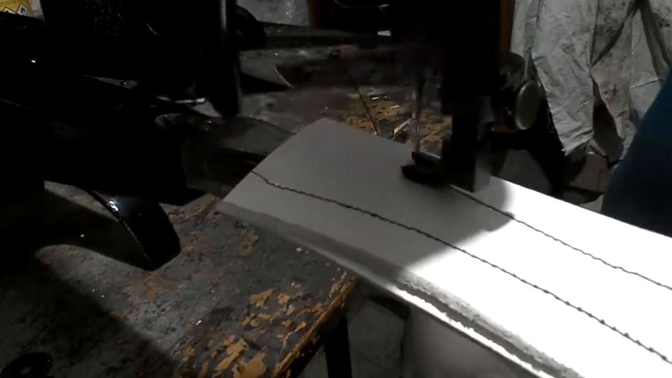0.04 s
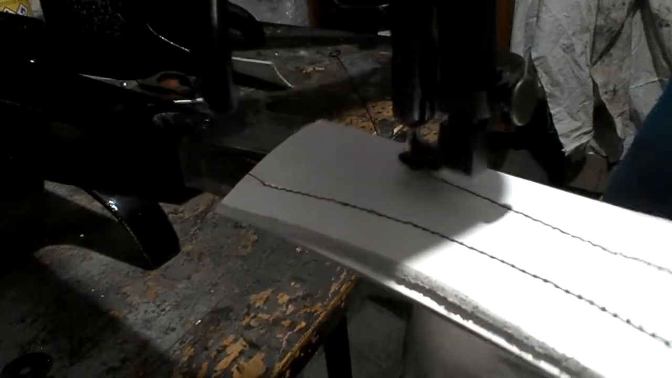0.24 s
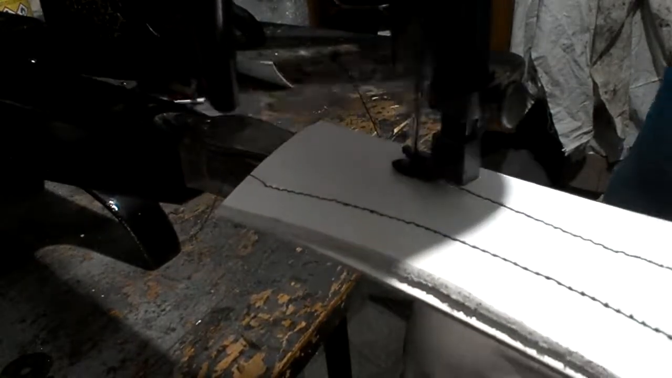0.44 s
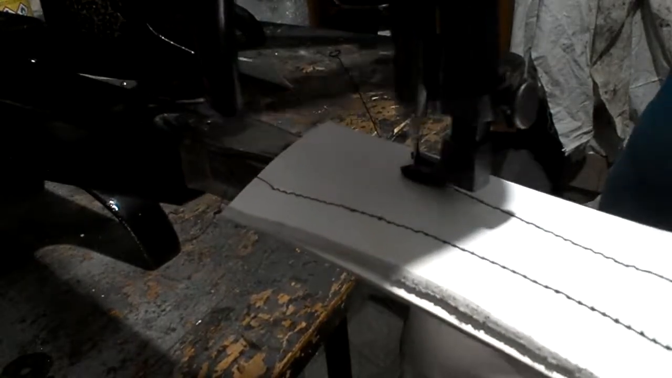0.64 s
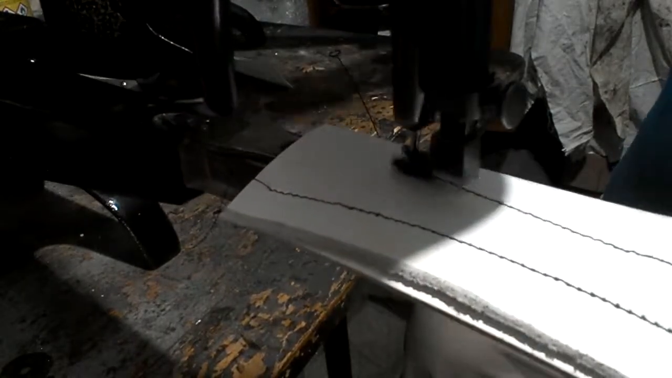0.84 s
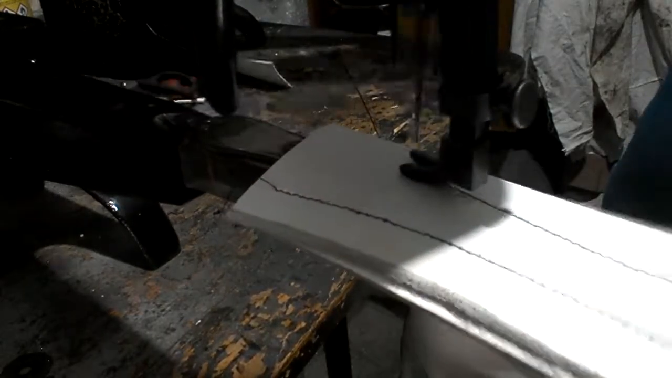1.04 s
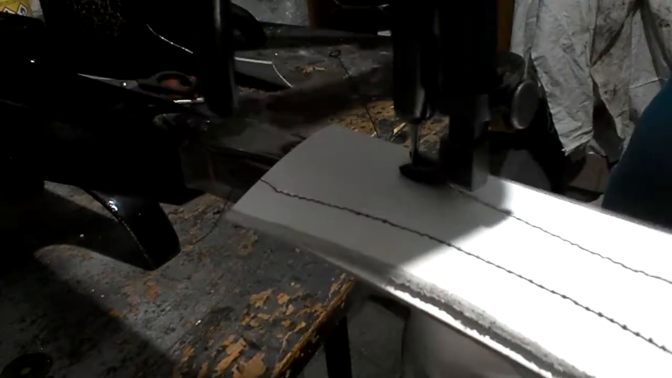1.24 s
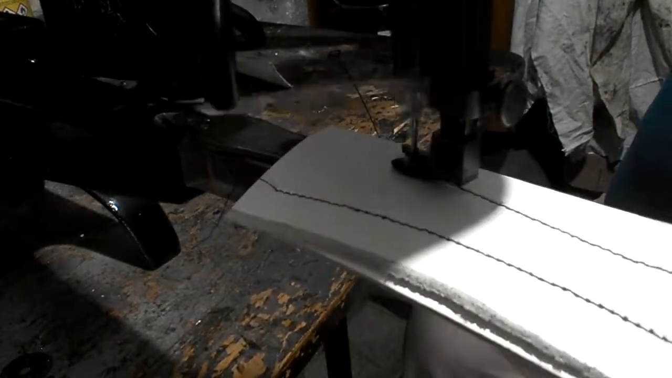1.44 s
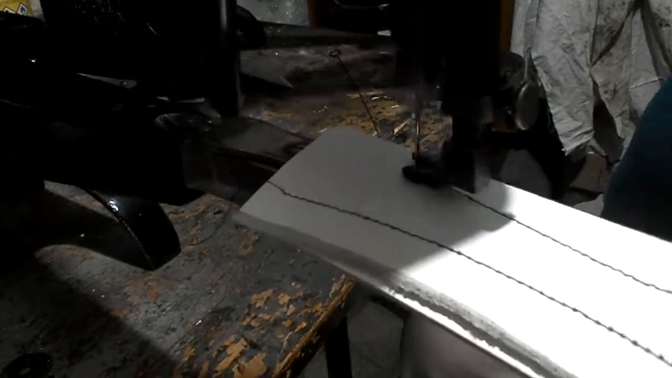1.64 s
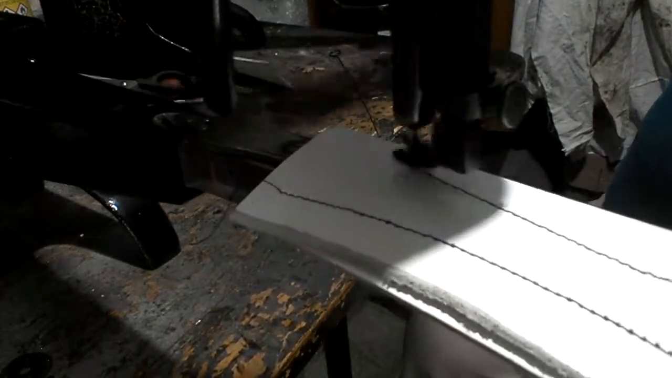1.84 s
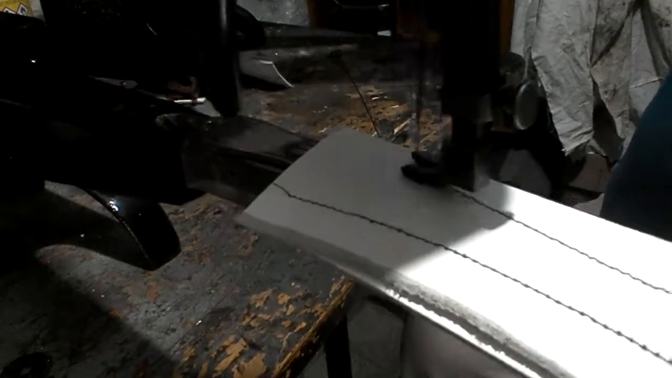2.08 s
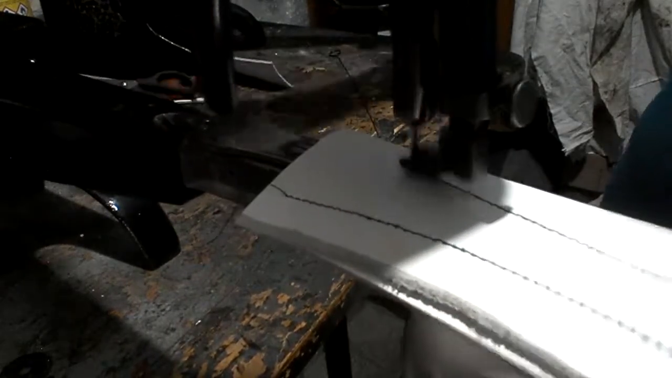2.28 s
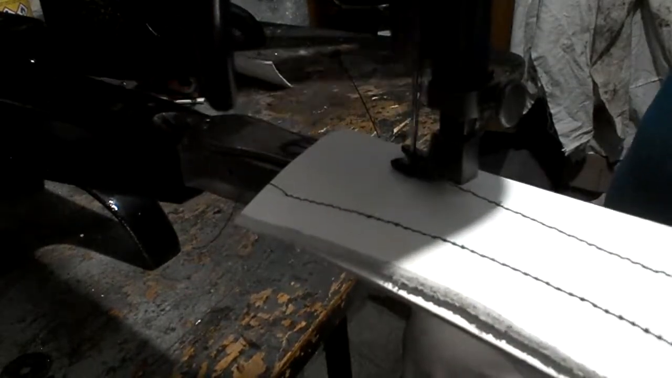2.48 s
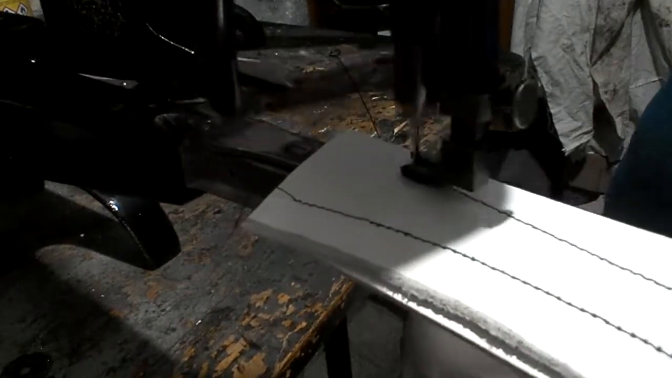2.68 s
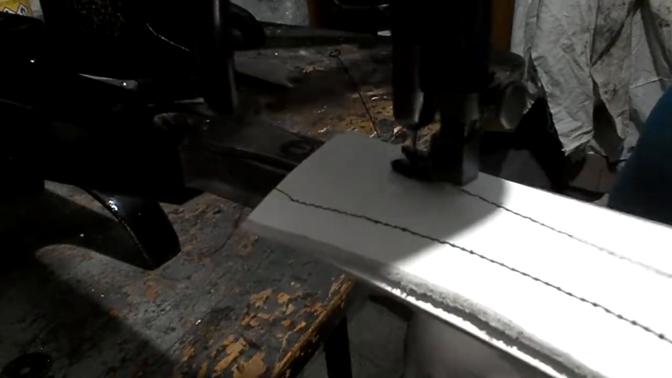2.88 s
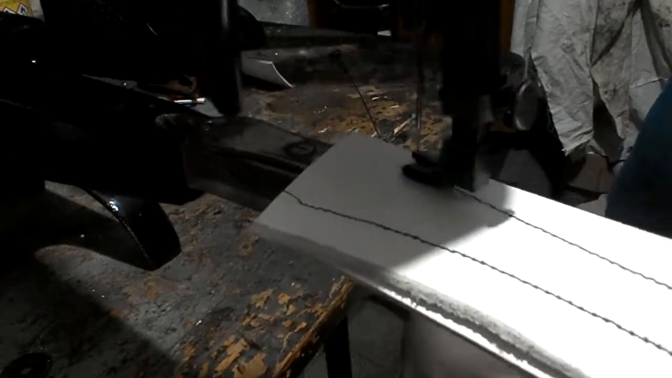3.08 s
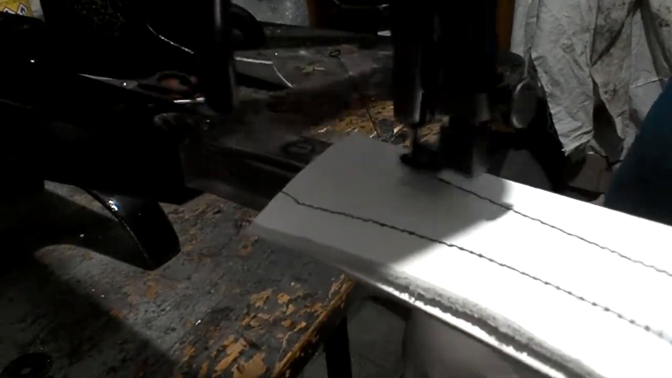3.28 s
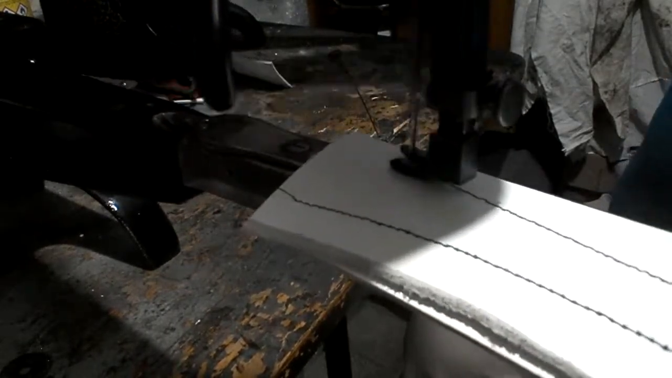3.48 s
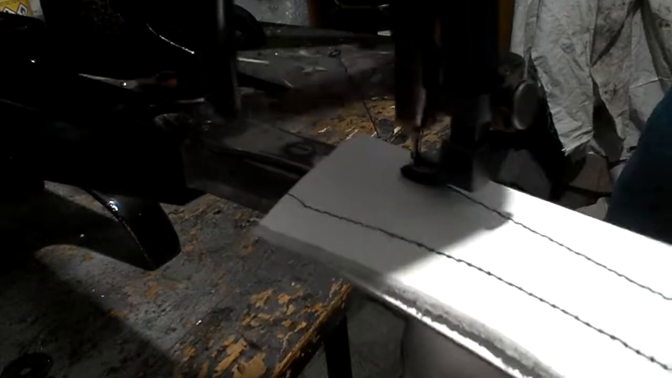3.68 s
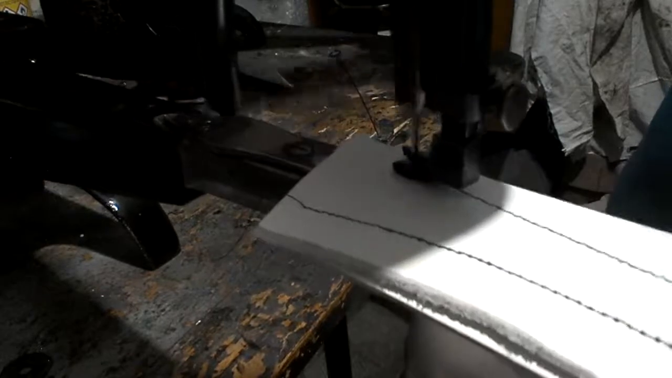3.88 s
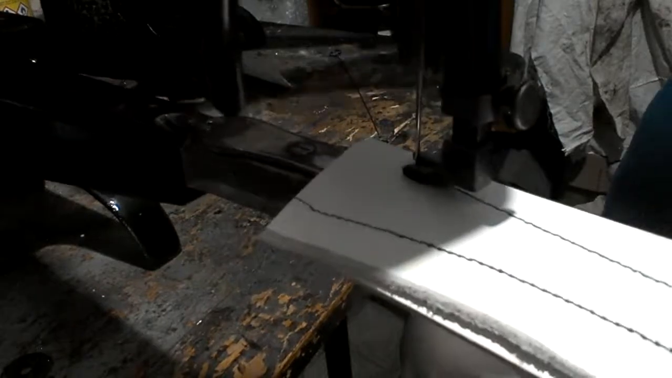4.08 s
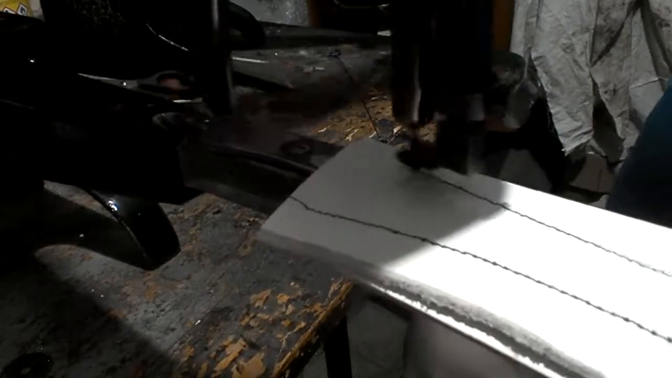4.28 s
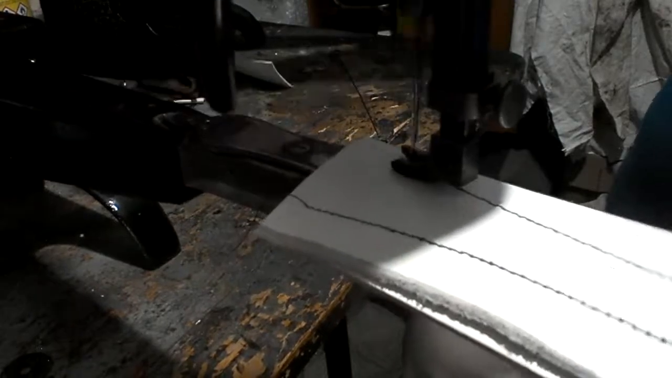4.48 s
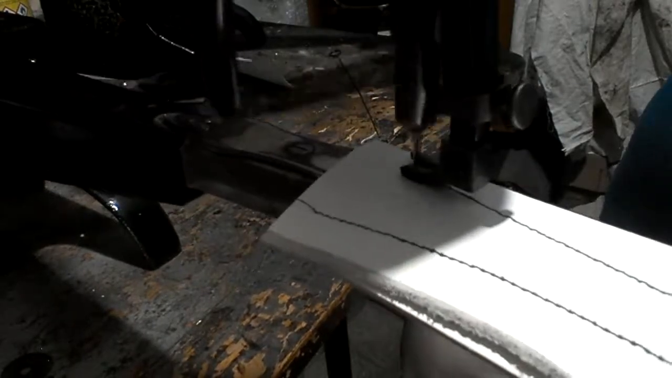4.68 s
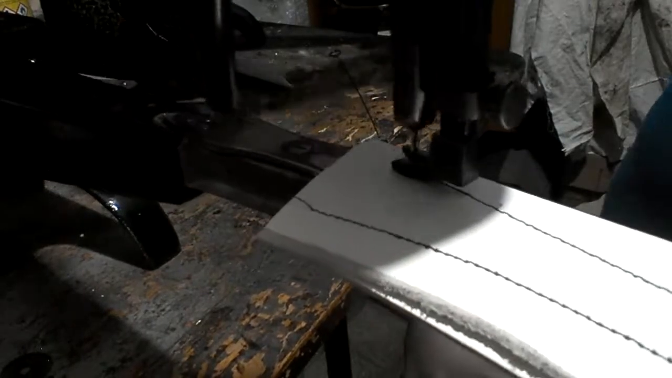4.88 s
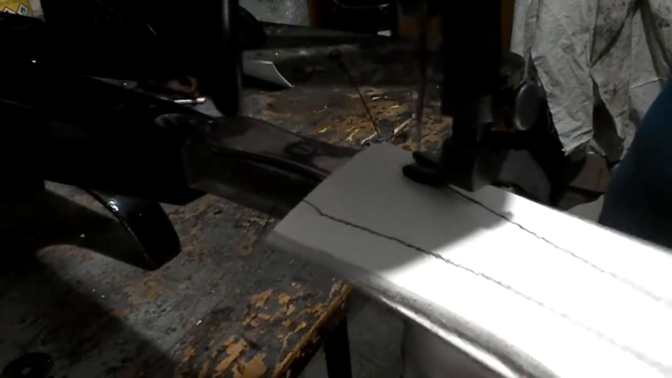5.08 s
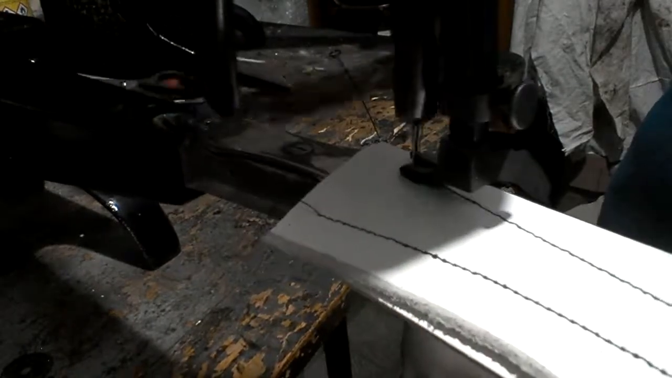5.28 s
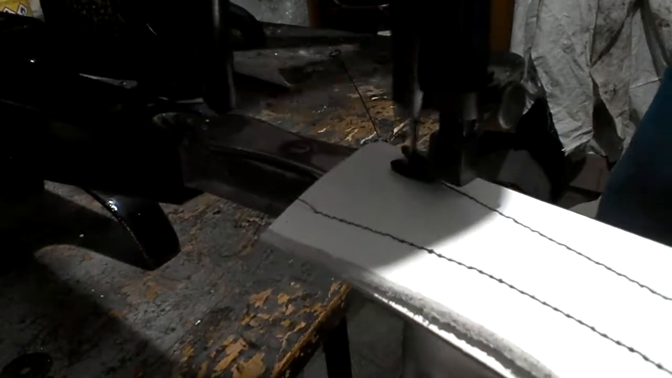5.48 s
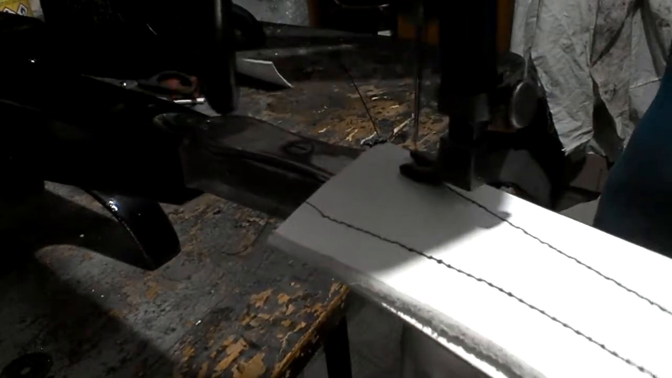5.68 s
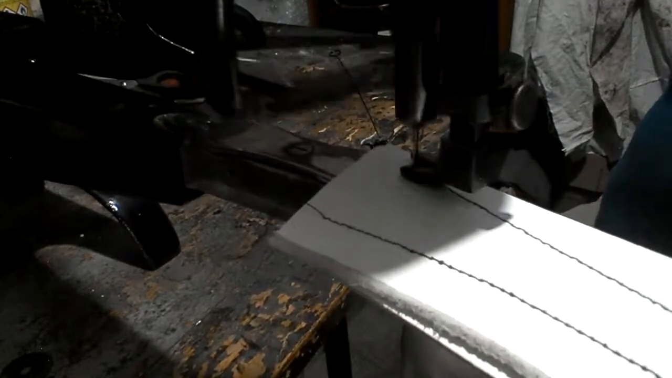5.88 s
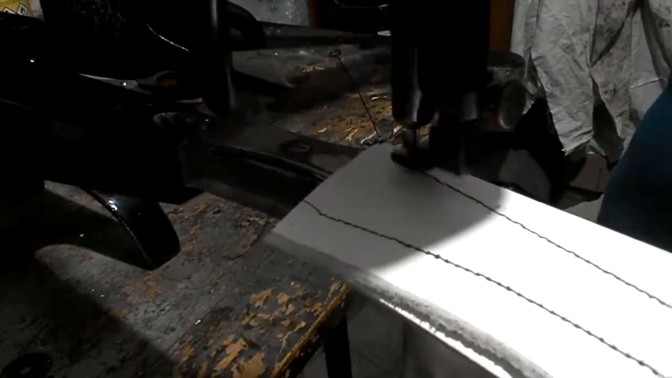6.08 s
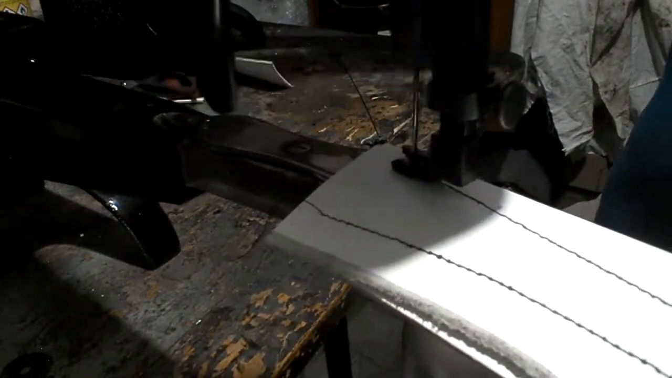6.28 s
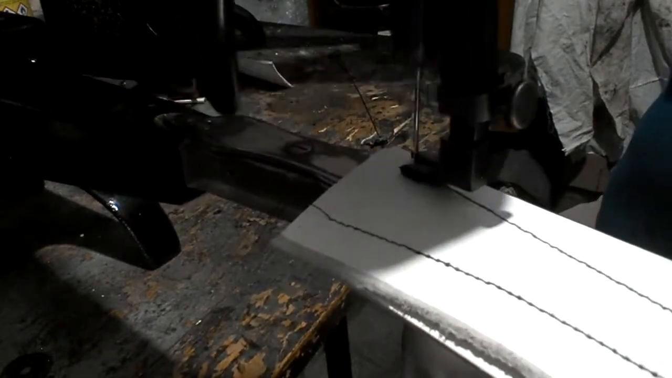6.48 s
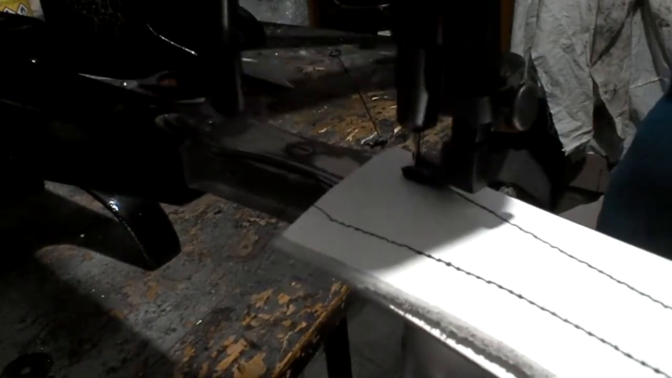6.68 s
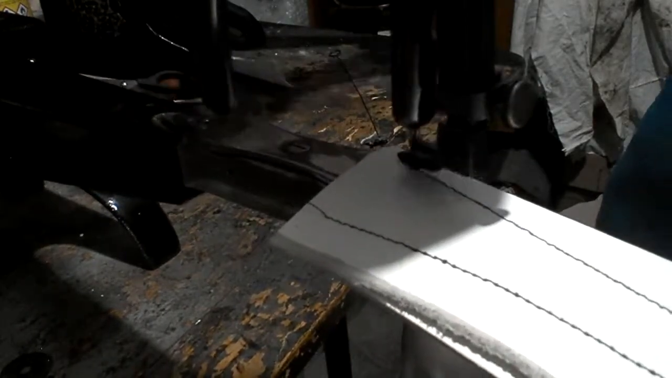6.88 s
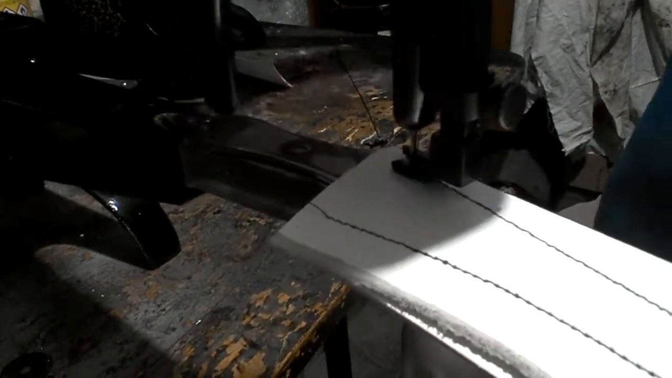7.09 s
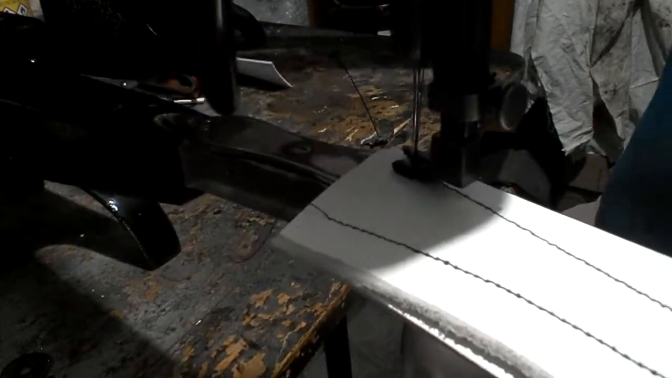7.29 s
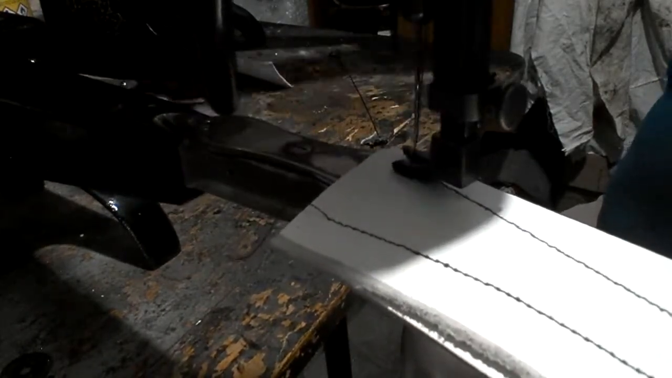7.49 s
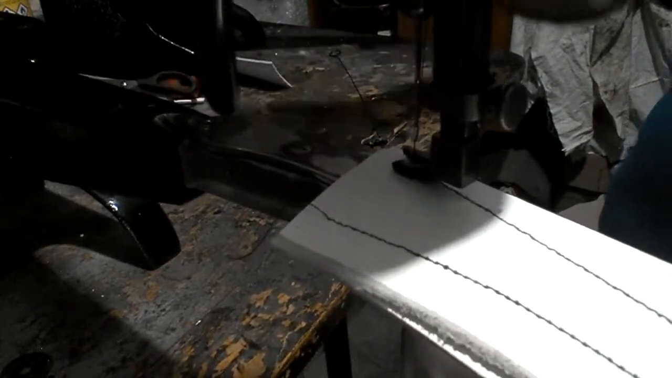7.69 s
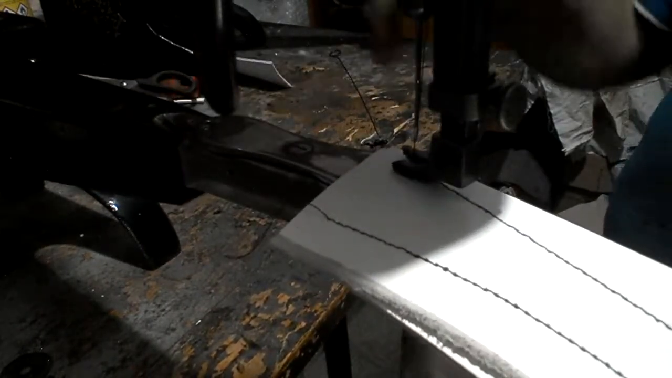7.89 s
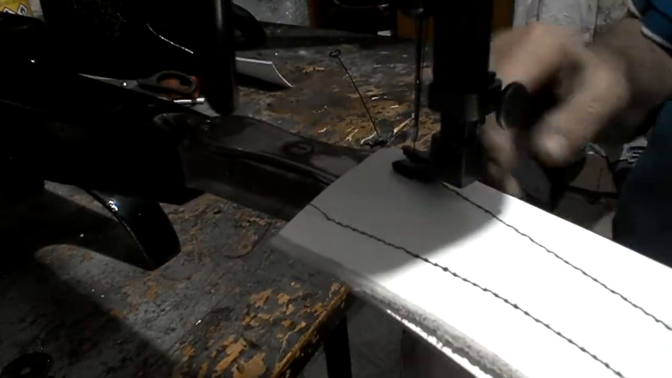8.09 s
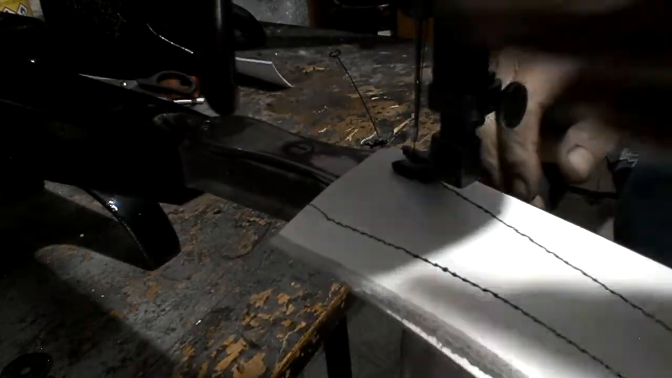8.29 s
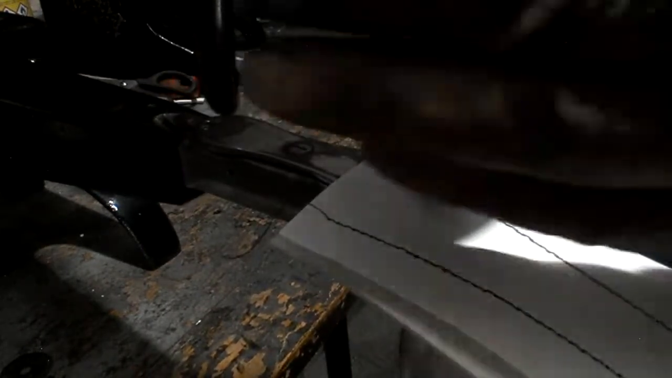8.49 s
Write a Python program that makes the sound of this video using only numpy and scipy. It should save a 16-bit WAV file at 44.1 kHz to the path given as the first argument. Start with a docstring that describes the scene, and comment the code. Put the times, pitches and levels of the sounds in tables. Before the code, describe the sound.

A close, dry, centred sound of an old treadle sewing machine in a quiet workshop with a faint low hum and thin hiss. From 0 to about 5 seconds it stitches steadily, roughly two turns a second. Every turn repeats the same uneven chain of a dozen metal contacts: hard clacks, lighter bright ticks with very short high rings, quick rattles, and dull knocks carried into the iron bed and wooden table. A brief scratchy rub of sliding parts falls mid-turn, and a low treadle rumble swells once per turn. Around 5 seconds the drive lets go; from 5.3 to 7.2 the turns lengthen, the clatter thins into separate, softer clicks and the rumble fades. The shaft stops near 7.2. A few tiny linkage ticks settle until about 7.6, then just the quiet room hum continues to the end, near 8.5.

```python
"""In a quiet, humming workshop an old treadle sewing machine stitches about twice a second, then coasts to a stop.
Each turn of the shaft brings the same chain of metal contacts. Each contact is a push, a rattle and an after-ring
that shake the table, bed, arm, linkage and small steel parts; many also ring with a note of their own.
Sliding parts add a rub and the treadle a noise that swells once a turn. Shaped noise makes the room hum.
Both channels carry the same sound, as from one close microphone."""
import sys
import numpy as np
from scipy.fft import rfft, irfft, next_fast_len
from scipy.io import wavfile
from scipy.ndimage import uniform_filter1d

SR = 44100
rng = np.random.default_rng(int(sys.argv[2]) if len(sys.argv) > 2 else 0)


def transcribe(signal):
    """Save signal, clipped to [-1, 1], as a 16-bit WAV file at the path in sys.argv[1]."""
    frames = np.atleast_2d(signal).T
    limited = np.clip(frames, -1, 1)
    pcm = np.round(limited * 32767).astype(np.int16)
    wavfile.write(sys.argv[1], SR, pcm)


N = 376613

# Metal contacts in one turn; the last row is the linkage settling after the stop.
# Columns: angle [turns], table_db, bed_db, arm_db, linkage_db, small_parts_db [dB before softening and scatter],
# rattle_s [s to fade by 60 dB]
CONTACT_PARTS = [(0, -38.5, -24.5, -23, -10.5, -36.5, 0.012), (.085, -21, -15.5, -15, -7.5, -55, 0.017),
                 (0.149, -39, -16, -16, -10.5, -32.5, 0.066), (0.166, -32.5, -28, -24, -9.5, -47.5, 0.0066),
                 (0.228, -36, -29.5, -24.5, -12, -17.5, 0.002), (.352, -42, -27, -20, -16, -29, 0.011),
                 (0.457, -42, -33.5, -18, -8.5, -37.5, 0.025), (0.515, -39, -26.5, -23, -8.5, -23.5, 0.011),
                 (0.555, -19.5, -22, -12.5, -5.5, -20.5, 0.0077), (.706, -33, -23, -41, 6, -11, 0.0017),
                 (.796, -25, -23.5, -21.5, -12.5, -41, 0.11), (.966, -21.5, -9.5, -9.5, -14.5, -31, 0.12),
                 (1, -22.5, -20, -17.5, -4, -8.5, 0.0088)]
FULL_SPEED = 2.091  # turns a second


def amp(db):
    """Turn decibels into a plain gain."""
    return 10 ** (np.asarray(db) / 20)


def unit(x):
    """Scale each row to an average (rms) strength of 1."""
    return x / np.sqrt(np.mean(x ** 2, -1, keepdims=True) + 1e-20)


def filtered(x, response):
    """Multiply the spectrum of x by a response that depends on frequency."""
    size = next_fast_len(N + SR // 2)
    hz = np.fft.rfftfreq(size, 1 / SR)
    return irfft(rfft(x, size) * response(hz), size)[..., :N]


def hiss(spectrum):
    """Noise of rms 1, shaped by (pitch_hz, level_db) points joined on a log pitch axis."""
    points_hz, points_db = np.transpose(spectrum)

    def gain(hz):
        return amp(np.interp(np.log(hz + 1), np.log(points_hz), points_db))

    return unit(filtered(rng.standard_normal(N), gain))


def room():
    """The quiet workshop: steady noise with most of its strength in low humming bands."""
    # Colour of the room: pitch_hz [Hz], level_db [relative dB per Hz]
    room_colour = [(20, -18.5), (83, -0.5), (112, -21), (143, -1), (245, -9), (310, -20.5), (2300, -31),
                   (4300, -21), (5800, -34), (6700, -22.5), (7800, -35), (12500, -33.5), (14000, -29)]
    return amp(-66.5) * hiss(room_colour)


def shaft():
    """Times and shaft angles: the treadle drives the shaft unevenly, then it coasts to a stop."""
    # Path of the shaft: time_s [s], angle [turns]
    shaft_path = [(0, -.385), (.1878, 0), (.4419, .5), (.7033, 1), (.9689, 1.5), (1.2245, 2), (1.4889, 2.5),
                  (1.7398, 3), (1.9968, 3.5), (2.2416, 4), (2.4964, 4.5), (2.7412, 5), (2.99, 5.5),
                  (3.2343, 6), (3.4831, 6.5), (3.7241, 7), (3.959, 7.5), (4.2006, 8), (4.4522, 8.5),
                  (4.7145, 9), (4.9825, 9.5), (5.2743, 10), (5.4734, 10.352), (5.5335, 10.457),
                  (5.5759, 10.555), (5.7423, 10.796), (5.8714, 11), (5.9505, 11.085), (5.971, 11.149),
                  (6.0262, 11.228), (6.2019, 11.457), (6.2625, 11.555), (6.3807, 11.706), (6.4544, 11.796),
                  (6.6205, 12), (6.7797, 12.149), (6.8075, 12.166), (6.8702, 12.228), (7.0132, 12.352),
                  (7.1242, 12.457), (7.1683, 12.515), (7.2155, 12.556)]
    return np.transpose(shaft_path)


def shaft_motion():
    """Shaft angle in turns, and smoothed speed in units of two turns a second, at every sample."""
    times, turns = shaft()
    angle = np.interp(np.arange(N) / SR, times, turns)
    speed = abs(uniform_filter1d(np.gradient(angle) * SR, size=4000) / 2)
    return angle, speed


def treadle(angle, speed):
    """The treadle loads the table: noise that swells once a turn and follows the speed."""
    # Colour of the treadle noise: pitch_hz [Hz], level_db [relative dB per Hz]
    treadle_colour = [(20, -9.5), (120, 5.5), (350, 2.5), (900, -60.5)]
    load = amp(-61.5 + 8.8 * np.cos(2 * np.pi * (angle - .65))) * speed
    return load * hiss(treadle_colour)


def sliding(angle, speed):
    """Strength of the rub on each body: sliding parts rub harder at speed."""
    # Rub around one turn: angle [turns], level_db [dB before speed and the body shares]
    slide_levels = [(.16, -59), (.3, -53.5), (.42, -66.5), (.48, -38.5), (.53, -46.5), (.6, -51.5),
                    (.9, -54)]
    rub = amp(np.interp(angle, *np.transpose(slide_levels), period=1)) * speed ** 1.6
    return rub * amp([[-8], [-8], [-10], [-4], [-20]])  # table, bed, arm, linkage, small parts


def grains(size, depth_db):
    """Gains that flicker within size samples, partly shared by the five bodies and partly their own."""
    shared = rng.standard_normal(N)
    own = rng.standard_normal((5, N))
    return amp(depth_db * unit(uniform_filter1d(shared + own, size, axis=1)))


def passes(angle, reach):
    """Turn number, time and speed (over reach turns either side) each time the shaft passes an angle."""
    times, turns = shaft()
    turn = np.arange(np.ceil(turns[0] - angle), turns[-1] - angle)
    here = turn + angle
    before, after = np.clip([here - reach, here + reach], turns[0], turns[-1])
    speed = (after - before) / (np.interp(after, turns, times) - np.interp(before, turns, times))
    return turn, np.interp(here, turns, times), speed


def blows():
    """For each part, the times and strengths (dB) of its blows and its usual strength; slow blows are softer."""
    # Strength of each contact, in the order of CONTACT_PARTS: full_speed_db [dB],
    # halving_db [dB lost when the speed halves], scatter_db [dB]
    blow_forces = [(-11.3, 11.5, .5), (-24.5, 19.5, 3), (-23.5, 14, 2), (-16.5, 7, 2.5), (-11.5, 4.5, -0.1),
                   (-19, 10.5, 1.5), (-24, 4.5, 2), (-17.5, 8, 4), (-19.5, 17.5, 2.5), (-27, 1, 2.5),
                   (-25, 7, 1), (-32.5, 5.5, 1.5)]
    # The linkage settles after the shaft has stopped: time_s [s], strength_db [dB]
    settling_blows = [(7.2775, -48.5), (7.3125, -45), (7.4212, -48.5), (7.4484, -45.5), (7.4732, -43.5),
                      (7.5113, -35.5), (7.6121, -52)]
    slack_part, slack_turn, slack_db = 1, 10, -13  # goes slack once the treadle is let go
    catch_part, catch_turns = 9, [4, 5, 8, 10, 11]  # catches only in these turns
    jitter_s = .0007
    for k, (part, (full_db, halving_db, scatter_db)) in enumerate(zip(CONTACT_PARTS, blow_forces)):
        turn, times, speed = passes(part[0], reach=.25)
        strength_luck, time_luck = rng.standard_normal((2, len(times)))
        db = full_db + halving_db * np.log2(speed / FULL_SPEED) + scatter_db * strength_luck
        if k == slack_part:
            db = db + slack_db * (turn >= slack_turn)
        hit = np.isin(turn, catch_turns) | (k != catch_part)
        yield (times + jitter_s * time_luck)[hit], db[hit], full_db
    times, db = np.transpose(settling_blows)
    yield times, db, np.median(db)


def part_contacts():
    """The main blows; a softer one keeps more of its drive, most of all in the table and bed."""
    # Notes of each part, in the order of CONTACT_PARTS: lists of pitch_hz [Hz], level_db [dB against the blow]
    part_rings = [
        [(4650, -6.5)],
        [],
        [(4900, -4.5)],
        [(3920, -6)],
        [(4870, -16), (10000, -18)],
        [(6600, -6), (13100, -13.5)],
        [(7020, -6.5)],
        [(6300, -4.5)],
        [(2520, -8)],
        [(4700, -2)],
        [(4435, -3.5)],
        [],
        [],
    ]
    # Drive gained by softer blows: table, bed, arm, linkage, small parts [dB per dB of softness]
    softness_gain = np.array([0.23, 0.47, 0.11, 0.022, 0.1])
    rows = []
    for part, rings, (times, levels, usual_db) in zip(CONTACT_PARTS, part_rings, blows()):
        for when, db in zip(times, levels):
            drive_db = np.array(part[1:-1]) + np.multiply(softness_gain, usual_db - db)
            rows.append((when, db, drive_db, part[-1], rings))
    return rows


def tick_contacts():
    """Bounces and light ticks that follow the shaft and soften as it slows."""
    # Ticks in one turn: angle [turns], strength_db [dB at full speed before scatter],
    # small_parts_db [dB before scatter], pitch_hz [Hz before scatter]
    light_ticks = [(0.242, -23, -18, 4660), (0.363, -40, -2, 8350), (.482, -24, -19.5, 8970),
                   (0.533, -24, -29, 7500), (0.65, -30, -38.5, 4860), (.706, -31.5, -25, 5200),
                   (0.741, -36.5, -6.5, 9500), (0.826, -48, -31.5, 7450), (.87, -27, -31.5, 4000),
                   (0.906, -28, -39, 4740), (0.935, -29, -19.5, 4900)]
    # Drive of every tick into table, bed, arm, linkage [dB before scatter]
    tick_drives = [-29.5, -22.5, -17.5, -9]
    rows = []
    for angle, db, small_db, hz in light_ticks:
        _, times, speeds = passes(angle, reach=.05)
        luck = rng.standard_normal((len(times), 2))
        for when, speed, (time_luck, strength_luck) in zip(times, speeds, luck):
            soft_db = db + 26 * np.log10(speed / FULL_SPEED) + 1.28 * strength_luck
            drive_db = [*tick_drives, small_db]
            rows.append((abs(when + .001 * time_luck), soft_db, drive_db, .009, [(hz, -11)]))
    return rows


def ring_note(hz, t):
    """One part's own note: it lasts a number of cycles, so high notes are brief."""
    cycles = hz * rng.normal(1, 0.014) * t
    fade = amp(-60 * cycles / 40) + 0.25 * amp(-60 * cycles / 220)
    return fade * np.sin(2 * np.pi * cycles)


def strike():
    """Every contact gives a push, a short rattle with an after-ring, and the part's own notes."""
    # How table, bed, arm, linkage and small parts take a contact:
    # push_db [dB], after_ring_s [s to fade by 60 dB], after_ring_db [dB before the build-up]
    body_linger = [(22.46, 0.47, -8.5), (20.1, 0.26, -6), (13.3, 0.12, -5), (7.9, 0.092, -11),
                   (8, 0.041, -6.5)]
    t = np.arange(SR // 4) / SR
    push, shake_power = np.zeros((2, 5, N + SR))
    notes = np.zeros(N + SR)
    push_db, after_s, after_db = np.transpose(body_linger)[..., None]
    build_up = 1 - np.exp(-t / 0.00095)
    after_ring = amp(after_db - 60 * t / after_s) * build_up
    for when, db, drive_db, rattle_s, rings in part_contacts() + tick_contacts():
        start = round(when * SR)
        stop = start + len(t)
        drive = amp(db + np.array(drive_db) + rng.normal(0, 1.66, size=5))
        push[:, start] += drive
        held = min(1, rattle_s / 0.0046)  # a glancing contact leaves little after-ring
        envelope = amp(-60 * t / rattle_s) + held * after_ring
        shake_power[:, start:stop] += (drive[:, None] * envelope) ** 2
        for hz, ring_db in rings:
            notes[start:stop] += amp(db + ring_db + rng.normal(0, 2)) * ring_note(hz, t)
    return amp(push_db) * push[:, :N], shake_power[:, :N], notes[:N]


def modes(hz, body):
    """Resonances of one body, falling steeply above the last, scaled so white noise keeps its power."""
    response = 0
    for k, (center, width, db) in enumerate(body):
        damping = 1j * hz * width
        response = response + (-1) ** k * amp(db) * damping / (center ** 2 - hz ** 2 + damping)
    u = hz / (1.174 * body[-1][0])
    response = response / (1 - u * u + 1j * np.sqrt(2) * u) ** 2
    return response / np.sqrt(np.mean(abs(response) ** 2))


def machine():
    """The sewing machine: each body colours its share of pushes, rattles and rub; notes and treadle join in."""
    # Resonances of table, bed, arm, linkage, small parts: lists of
    # pitch_hz [Hz], width_hz [Hz], level_db [dB before the body is scaled]
    body_modes = [
        [(112.3, 18, -6), (181.7, 23, 1.5), (241, 16, 1)],
        [(297, 14, -1), (385, 44, -2.5), (469.8, 33, 2), (558.6, 48, -2.5), (694, 98, -7.5)],
        [(856, 143, -3), (1174, 1020, -7), (1490, 206, -0.5), (2305, 490, -3)],
        [(3256, 560, -3), (3886, 417, 2.5), (4250, 130, 4), (4560, 360, 5.5), (5160, 1620, 0), (6625, 240, 3),
         (7300, 1400, -21)],
        [(8000, 5600, 10), (13200, 3000, -32)],
    ]
    angle, speed = shaft_motion()
    push, shake_power, notes = strike()
    rub = sliding(angle, speed)
    # loose parts chatter, so the shaking comes in grains
    chatter = grains(size=60, depth_db=2.5)
    shaking = np.sqrt(shake_power + rub ** 2) * chatter * rng.standard_normal((5, N))
    bodies = filtered(push + shaking, lambda hz: np.array([modes(hz, body) for body in body_modes]))
    return bodies.sum(0) + notes + treadle(angle, speed)


def scene():
    """The room and the machine together, the same in both channels."""
    mono = room() + machine()
    return np.array([mono, mono])


def record(dry):
    """Nothing is kept from 16000 Hz upwards."""
    return filtered(dry, lambda hz: hz < 16000)


dry = scene()
out = record(dry)
transcribe(out)
```